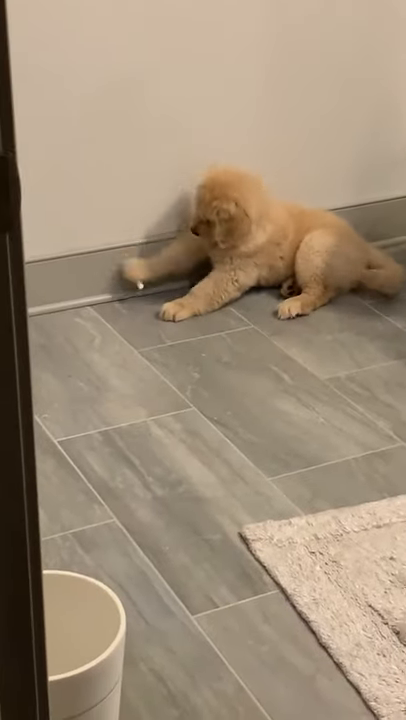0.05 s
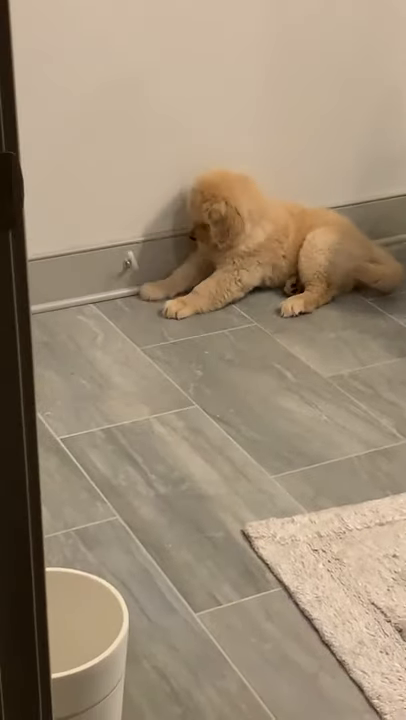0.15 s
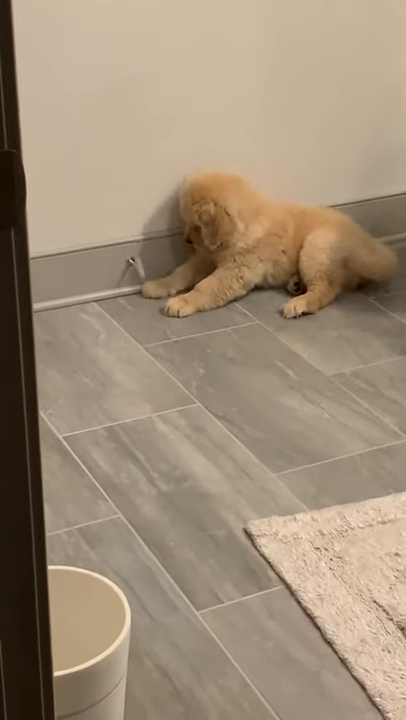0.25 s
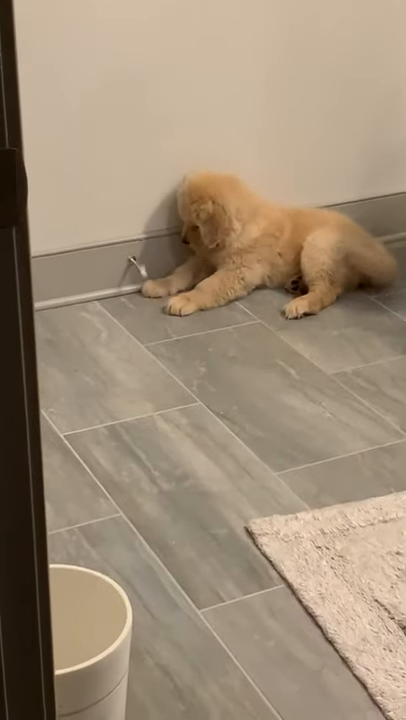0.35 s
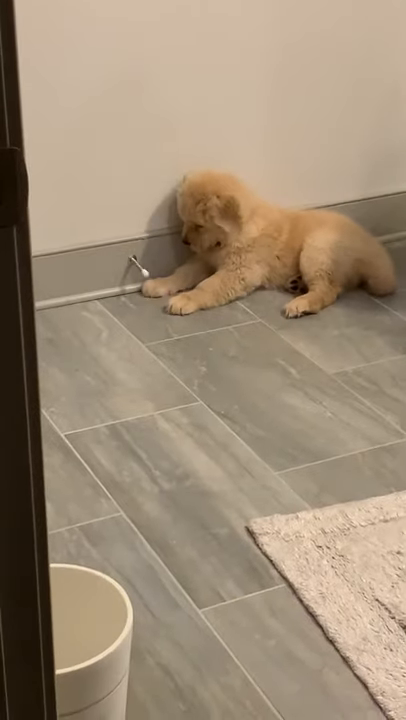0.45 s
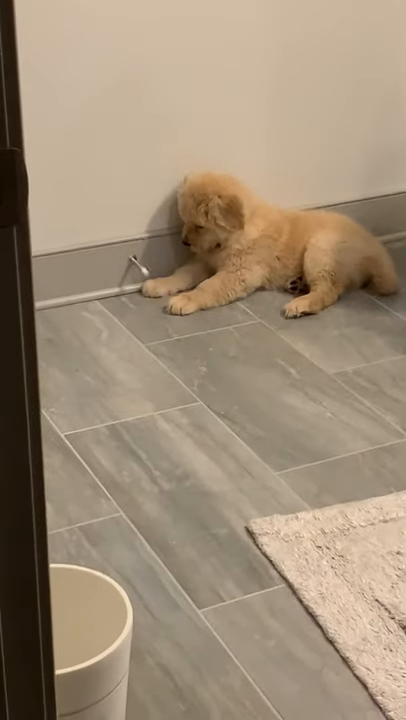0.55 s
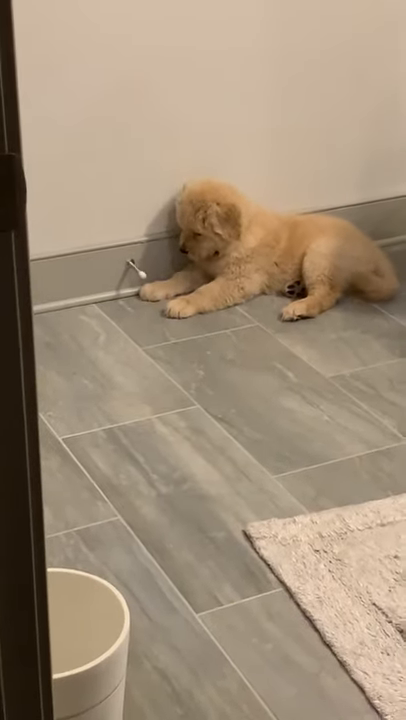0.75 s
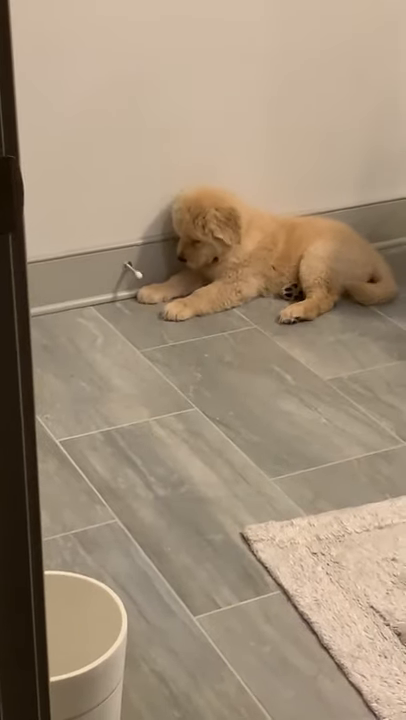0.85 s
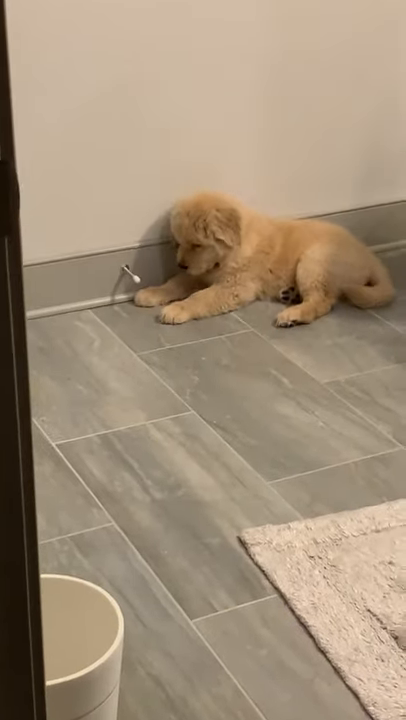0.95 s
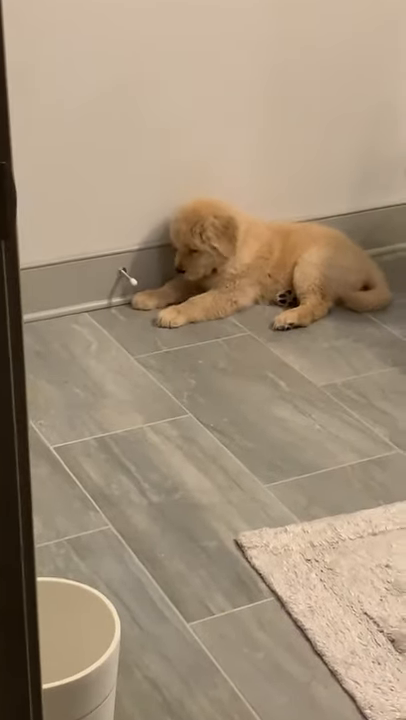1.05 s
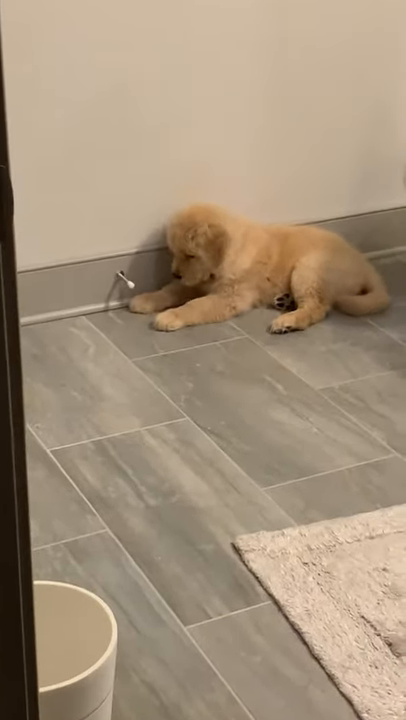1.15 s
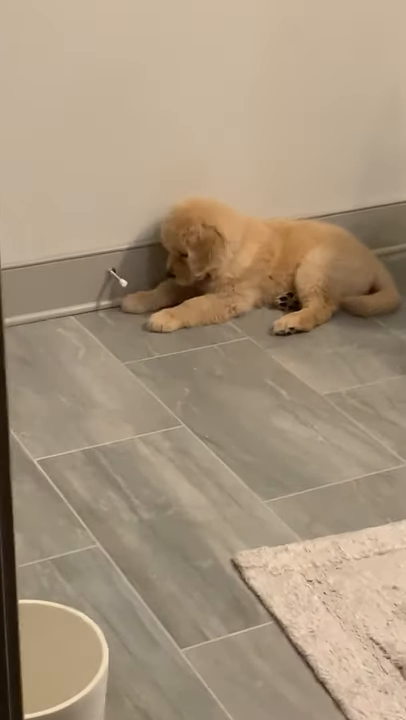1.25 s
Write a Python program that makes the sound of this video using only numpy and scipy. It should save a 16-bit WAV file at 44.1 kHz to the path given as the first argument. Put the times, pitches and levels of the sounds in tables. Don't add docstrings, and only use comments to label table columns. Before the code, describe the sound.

A spring door stopper is pawed, clatters against the wall, then twangs in quickening, fading pulses

```python
import sys
import numpy as np
from scipy import signal
from scipy.fft import rfft, irfft
from scipy.io import wavfile

SR = 44100
rng = np.random.default_rng(int(sys.argv[2]) if len(sys.argv) > 2 else 0)


def store_pcm(level_fs):
    pcm = np.round(np.clip(level_fs, -1, 1) * 32767).astype(np.int16)
    wavfile.write(sys.argv[1], SR, np.atleast_2d(pcm).T)


def invert_db(level):
    return 10 ** (np.asarray(level, dtype=float) / 20)


N = 57330
TIME = np.arange(N) / SR
PAD = 2 ** 17
HZ = np.maximum(np.arange(PAD // 2 + 1) * SR / PAD, 1)
WALL_LOW_HZ = 129

# f/Hz, level/dB
HUM_COLOUR = [(25, -20), (59, -2.5), (107, -5.5), (200, 3.5), (350, -8.5), (560, -28.5), (1000, -15.5),
              (1800, -39)]
# t/s, level/dB
RUSTLE = [
    (0, -52),
    (.1, -56.5),
    (.3, -39),
    (.9, -57),
    (1.15, -63.5),
    (1.3, -120),
]
# f/Hz, level/dB per Hz
RUSTLE_COLOUR = [(880, -60), (1500, -1), (5400, -7.5), (7350, -10), (7790, -5), (9540, -3), (15000, -1)]

# t/s, level/dB
PUSHES = [(0.052, -53), (.128, -43.5), (0.146, -65), (0.24, -38.5), (.255, -27.5), (.272, -20),
          (0.304, -20.5), (.318, -22.5), (0.348, -22), (.378, -21), (0.397, -20.5), (.425, -25.5),
          (.447, -29), (.46, -20), (0.511, -38)]
# t/s, level/dB
PAW_TAP = [
    (0.189, -49),
    (0.199, -35),
]
# f/Hz, level/dB, t60/s
TILE_MODES = [(415, -5, 0.11), (340, 1.5, 0.069)]
# t/s, level/dB
CLAW_DRAG = [
    (0, -84),
    (.12, -61),
    (.127, -36),
    (.18, -50.5),
    (.195, -31),
    (.235, -47),
    (.26, -65),
    (.3, -90),
    (1.3, -99),
]
# f/Hz, level/dB, t60/s
CLAW_MODES = [(1274, -15.5, 0.14), (2020, -7, 0.028), (2490, 4.5, 0.013), (2690, 1, 0.022),
              (3350, 14, 0.004)]

# f/Hz, level/dB, t60/s
WALL_MODES = [(178.2, -1.5, 0.13), (202, 5, 0.19), (253.8, -6.5, 0.24), (303, -7, 0.079),
              (354, -10.5, 0.243), (394, -7.5, 0.051), (473.3, -17, 0.095), (621, -15, 0.13)]
# centre t/s, length t/s, level/dB
BOOMS = [(.07, 0.067, -48.5), (.143, 0.048, -38.5), (.252, 0.018, -30), (.281, 0.062, -23),
         (.322, 0.044, -20.5), (.358, 0.073, -24.5), (.394, 0.049, -24.5), (.434, 0.033, -28.5),
         (.462, 0.055, -23.5), (.497, 0.055, -30), (.522, 0.031, -27), (.552, 0.061, -30.5)]
# f/Hz, level/dB, t60/s
FOOT_MODES = [(168, -2.5, .1), (189.8, 4, 0.19), (216, 3, 0.076), (268, -2, 0.13), (308, -1, 0.05),
              (352, -11.5, 0.24)]
# f/Hz, level/dB, t60/s
SPRING_MODES = [(887, -0.5, 0.4), (962, -6, 0.33), (1156, -0.5, 0.19), (1308, 4.5, 0.092), (1723, 2, 0.057)]

# t/s, f/Hz, level/dB,
# t60/s
PINGS = [(.125, 2020, -42.5, 0.12), (.149, 1238, -42, 0.06), (.150, 695, -45.5, 0.073),
         (.160, 1167, -39.5, 0.082), (.178, 1303, -39.5, 0.15), (.168, 3280, -48, .05),
         (.192, 1970, -35, 0.04), (.198, 1955, -30, 0.045), (.202, 2505, -31, 0.13),
         (.206, 1166, -39.5, 0.072), (.216, 1998, -32.5, 0.2), (.222, 3630, -48, .06),
         (.225, 1285, -36, 0.12), (.236, 1220, -36, 0.027), (.263, 734, -42, .08),
         (.300, 1976, -26.5, 0.073), (.305, 2417, -31, 0.11), (.310, 737, -31.5, 0.12),
         (.312, 1750, -31, 0.045), (.335, 1295, -29.5, 0.094), (.345, 1840, -26, 0.044),
         (.377, 2012, -24, 0.092), (.389, 2413, -16.5, 0.025), (.380, 682, -28.5, 0.086),
         (.405, 1307, -31, .1), (.410, 1874, -30, 0.11), (.447, 2244, -21.5, 0.047),
         (.449, 1490, -30, 0.088), (.458, 2227, -18.5, 0.077), (.455, 771, -40, 0.077),
         (.460, 850, -28, 0.05), (.477, 1302, -25.5, 0.12), (.486, 1367, -35, 0.14), (.470, 1820, -39, .08),
         (.512, 1270, -34, 0.049), (.395, 268, -21, 0.19), (.455, 268, -25.5, 0.29),
         (.480, 352, -29.5, 0.11), (.520, 653, -38.5, 0.077), (.53, 932, -38, 0.064),
         (.196, 415, -46, 0.088), (0.391, 278, -31.5, .08), (.3005, 7430, -28, .01),
         (.353, 6550, -30, 0.0094), (.354, 12200, -26, .015), (.364, 7030, -34.5, 0.019),
         (.376, 4300, -33, .01), (.316, 2200, -20, 0.031), (.4478, 4140, -24, 0.0092),
         (.3045, 4470, -31, 0.0091)]
# t/s, level/dB
BUZZ_LEVEL = [(0, -86), (.12, -63), (.16, -66), (.25, -72), (.33, -36.5), (.47, -37), (.56, -85),
              (.65, -44.5), (.83, -43.5), (1.0, -46), (1.15, -43), (1.3, -51.5)]
# f/Hz, level/dB, t60/s
BOARD_MODES = [(646, -7, 0.172), (728, -0.5, 0.032), (887, -8, 0.35), (966, -21, 0.089), (1128, -4.5, 0.13),
               (1299, 4, 0.023), (1348, -6, 0.21), (1490, -10.5, 0.14), (1750, -15.5, 0.065),
               (2100, -33, 0.026), (2160, -14.5, 0.093), (2200, -24, 0.043), (2610, -15, 0.036),
               (3630, -23, 0.013)]
# f/Hz, level/dB per Hz
KNOCK_COLOUR = [(240, -32), (400, -0.5), (873, -3), (1610, 0), (2550, 1), (5910, -17.5), (7210, -22),
                (9070, -18.5), (15500, -30.5)]
# f/Hz, width f/Hz, level/dB
TICK_MODES = [(4390, 1060, 5.5), (7820, 1880, -1.5), (12200, 1220, 8)]
# t/s, tick level/dB, board knock over tick level/dB
PAWED_SLAPS = [(0.124, -35, -7), (0.153, -30, -6), (0.1928, -49.5, 21.5), (0.263, -29.5, -5),
               (0.2682, -28.5, -6), (0.3042, -27.5, 9.5), (0.349, -26.5, -1), (0.3628, -32, 0.5),
               (0.378, -25, 6), (0.4115, -31, 1), (0.4263, -28.5, -7), (0.4472, -20, 4.5),
               (0.4594, -40, 12), (0.4958, -34, -3), (0.5425, -45, 15)]
# t/s, tick level/dB, board knock over tick level/dB
FREE_SLAPS = [(0.5912, -35.5, -0.5), (0.6165, -46, 1), (0.643, -38.5, 5), (0.6674, -46.5, 5),
              (0.6967, -38.5, 4.5), (0.7206, -58.5, 19.5), (0.7452, -42.5, 6.5), (0.7938, -41.5, 7),
              (0.818, -42, -1.5), (0.8435, -47.5, 14), (0.8894, -52, 16), (0.929, -52, 9.5),
              (0.9513, -67, 25), (0.97, -51.5, 13.5), (1.0107, -58, 7), (1.0265, -51, 3.5),
              (1.0457, -68.5, 17), (1.087, -62.5, 8.5), (1.1887, -67, 15)]

# f/Hz, t60/s
ROOM_T60 = [(150, 1), (1000, 0.72), (4000, 0.37), (14000, 0.17)]
# f/Hz, level/dB
ROOM_WET = [(150, -13.5), (240, -12), (400, -1.5), (700, -1.5), (1300, 0.5), (3000, 0.5), (12000, -5.5)]
# f/Hz, phase/rad
PORT_PHASE = [(100, 0), (1640, .3), (2840, 2.9), (4800, 3.3), (6500, 6.2), (9850, 9.42), (12500, 12.57),
              (15500, 15.7)]
# f/Hz, likeness/1
PORT_ALIKE = [(60, 0.87), (200, 0.94), (400, 0.2), (700, 0.11), (1400, 0.45), (3000, 0.39), (6500, 0.5),
              (9850, 0.95), (12000, 0.73)]
# f/Hz, level/dB
PORT_BALANCE = [(60, 1), (180, -4), (550, 1), (1650, -1), (4970, 1.5), (15000, -1.5)]
# f/Hz, level/dB
MIC_COLOUR = [(30, -12), (60, -1), (4500, 1), (5400, 1), (6500, 5.5), (9900, -3.5), (12500, -10),
              (15000, -13.5)]


def rms_one(x):
    return x / np.sqrt(np.mean(x ** 2) + 1e-20)


def level_in_time(rows):
    s, db = np.transpose(rows)
    return invert_db(np.interp(TIME, s, db))


def at_hz(points, hz=HZ):
    points = np.array(points)
    return np.interp(np.log(hz), np.log(points[:, 0]), points[:, 1])


def colour(x, points):
    bass_end = (points[0][0] / 2, points[0][1] - 30)
    db = at_hz([bass_end] + list(points))
    cepstrum = irfft(db * np.log(10) / 20)
    cepstrum[1:PAD // 2] *= 2
    cepstrum[PAD // 2 + 1:] = 0
    response = np.exp(rfft(cepstrum))
    response = response / np.sqrt(np.mean(abs(response) ** 2))
    return irfft(rfft(x, PAD) * response)[..., :N]


def ring(clicks, modes):
    out = 0
    for k, (hz, db, t60) in enumerate(modes):
        r = invert_db(-60 / (t60 * SR))
        w = 2 * np.pi * hz / SR
        mode = signal.lfilter([0, np.sin(w)], [1, -2 * r * np.cos(w), r * r], clicks + 1e-18)
        out = out + (-1) ** k * invert_db(db) * mode
    return out


def train(s, db):
    x = np.zeros(N)
    x[(np.asarray(s) * SR).astype(int)] = invert_db(db)
    return x


def grains(per_s):
    unevenness_db = 3.5
    sizes = invert_db(unevenness_db * np.minimum(rng.exponential(1, N), 4)) * rng.choice([-1, 1], N)
    return rms_one(sizes * (rng.random(N) < per_s / SR))


def soft(x):
    band = signal.butter(3, [WALL_LOW_HZ, 900], "band", fs=SR, output="sos")
    return signal.sosfilt(band, x)


def background():
    hum_db, mains_hz, mains_db = -52, 60, -61

    def noise(points):
        return rms_one(colour(rng.standard_normal((2, N)), points))

    hum = invert_db(hum_db) * noise(HUM_COLOUR)
    mains = invert_db(mains_db) * np.sin(2 * np.pi * mains_hz * TIME) * [[1], [0]]
    rustle = level_in_time(RUSTLE) * noise(RUSTLE_COLOUR)
    return hum + mains + rustle


def paw():
    push_db = 2
    pushes = ring(soft(train(*np.transpose(PUSHES))), WALL_MODES[2:])
    taps = ring(soft(train(*np.transpose(PAW_TAP))), TILE_MODES)
    return invert_db(push_db) * pushes + taps


def claws():
    catches = grains(1100)
    evenly = ring(catches, CLAW_MODES)
    return ring(catches * level_in_time(CLAW_DRAG), CLAW_MODES) / np.std(evenly)


def booms():
    boom_hz = 194.1
    swell = 0
    for s, length, db in BOOMS:
        swell = swell + invert_db(db) * np.cos(np.pi * np.clip((TIME - s) / length, -.5, .5)) ** 2
    return swell * np.sin(2 * np.pi * boom_hz * TIME)


def tugs():
    free_s, period_s, shorter_s = .5906, .0537, .00177
    tug_db, knock_db, loss_db, scatter_db = -32.5, -41.5, 1.24, 0.13
    back_db, first_db = -2.0, -5.5
    k = np.arange(-1, 26) / 2
    s = free_s + period_s * k - shorter_s * k * (k - 1) / 2
    returning = k % 1 > 0
    db = scatter_db * rng.standard_normal(len(k)) - loss_db * k
    db = db + back_db * returning + first_db * (k < 1)
    heard = s < (N - 1) / SR
    out, back = heard & ~returning, heard & returning
    outward = train(s[out], db[out])
    pulls = outward - train(s[back], db[back])
    return invert_db(tug_db) * ring(soft(pulls), FOOT_MODES) + invert_db(knock_db) * ring(outward, SPRING_MODES)


def pings():
    rise_s = 0.00058
    out = 0
    for s, hz, db, t60 in PINGS:
        t = np.maximum(TIME - s, 0)
        out = out + invert_db(db - 60 * t / t60) * (1 - np.exp(-t / rise_s)) * np.sin(2 * np.pi * hz * t)
    return out


def buzz():
    board_db, broad_db, wall_db, dull_hz = -10, -5, -18, 1400
    level = level_in_time(BUZZ_LEVEL)
    chatter = grains(2000)
    dull = signal.sosfilt(signal.butter(2, dull_hz, fs=SR, output="sos"), chatter)
    bright = (chatter - dull) * level / level.max()
    rub = (dull + bright) * level

    def even_gain(modes):
        return 1 / np.std(ring(chatter, modes))

    board = invert_db(board_db) * even_gain(BOARD_MODES) * ring(rub, BOARD_MODES)
    broad = invert_db(broad_db) * colour(rub, KNOCK_COLOUR)
    wall = invert_db(wall_db) * even_gain(WALL_MODES) * ring(soft(rub), WALL_MODES)
    return board + broad + wall


def slaps():
    run_s, scatter_db = 0.011, 2.5
    tick_db, board_db, broad_db = 8, -19, 13.5
    s, tick, knock = np.transpose(PAWED_SLAPS + FREE_SLAPS)
    luck = scatter_db * rng.standard_normal((len(s), len(BOARD_MODES)))
    contacts = grains(5000)

    def run(db):
        first = train(s, db)
        dying = signal.lfilter([1], [1, -np.exp(-1 / (run_s * SR))], first)
        return 0.18 * dying * contacts + 0.14 * first

    sharp = 0
    for k, (hz, width_hz, db) in enumerate(TICK_MODES):
        t60 = np.log(1000) / np.pi / width_hz
        sharp = sharp + ring(train(s, tick + tick_db + luck[:, k]), [(hz, db, t60)])
    board = 0
    for k, mode in enumerate(BOARD_MODES):
        board = board + (-1) ** k * ring(run(tick + knock + luck[:, k]), [mode])
    broad = colour(run(tick + knock), KNOCK_COLOUR)
    return sharp + invert_db(board_db) * board + invert_db(broad_db) * broad


def room(x):
    echo_db, gap_s = 4.5, 0.00033
    edges = 60 * 2 ** np.arange(0, 8.4, .5)
    white = rng.standard_normal((2, 2, N))
    tail = 0
    for k, (low, high) in enumerate(zip(edges, edges[1:])):
        t60 = at_hz(ROOM_T60, np.sqrt(low * high))
        fall = invert_db(-60 * TIME / t60) * (1 - np.exp(-TIME / gap_s))
        band = signal.sosfilt(signal.butter(2, [low, high], "band", fs=SR, output="sos"), white[k % 2])
        tail = tail + band * fall / np.sqrt(np.sum(fall ** 2))
    wet = invert_db(echo_db + at_hz(ROOM_WET))
    response = (wet * rfft(tail, PAD) + [[1], [0]]) / np.sqrt(1 + wet ** 2)
    return irfft(rfft(x, PAD) * response)[:, :N]


def ports(field):
    a, b = rfft(field, PAD)
    alike = np.clip(at_hz(PORT_ALIKE), 0, 1)
    phase = np.interp(HZ, *np.transpose(PORT_PHASE))
    turn = np.exp(.5j * phase) * invert_db(at_hz(PORT_BALANCE) / 2)
    same = np.sqrt((1 + alike) / 2) * a
    other = np.sqrt((1 - alike) / 2) * b
    return irfft([(same + other) * turn, (same - other) / turn])[:, :N]


def scene():
    near_share = 0.33
    near = pings() + booms() + tugs()
    no_deep_bass = signal.butter(4, WALL_LOW_HZ, "high", fs=SR, output="sos")
    stopper = signal.sosfilt(no_deep_bass, slaps() + paw() + buzz() + claws())
    return ports(room(stopper + near_share * near) + near * [[1], [0]] + background())


def roll_off(x):
    return signal.sosfilt(signal.butter(12, 15750, fs=SR, output="sos"), x)


def record(dry):
    fade_s, top_hz = .022, 15760
    fade = np.clip((N / SR - TIME) / fade_s, 0, 1)
    response = invert_db(at_hz(MIC_COLOUR)) * (HZ < top_hz)
    mix = irfft(rfft(dry * fade, PAD) * response)[:, :N]
    return roll_off(mix)


dry = scene()
out = record(dry)
store_pcm(out)
```